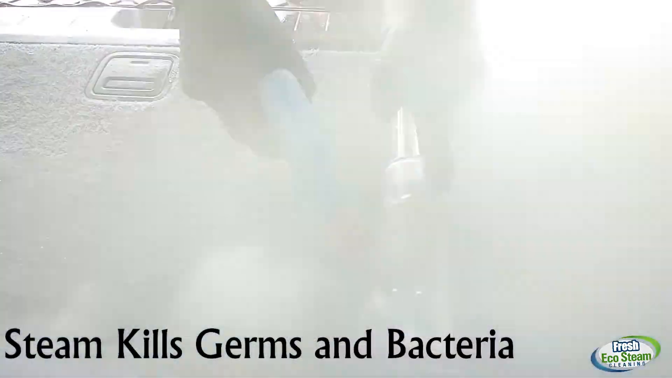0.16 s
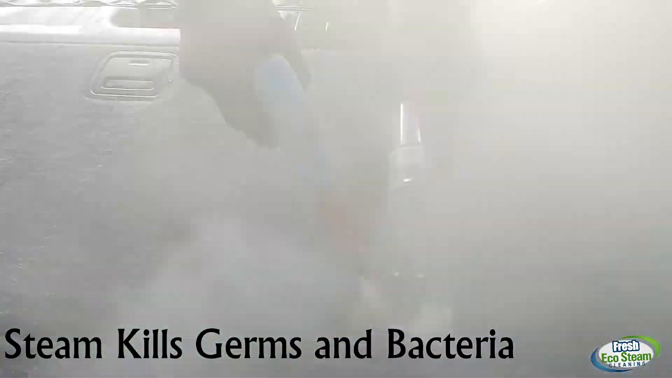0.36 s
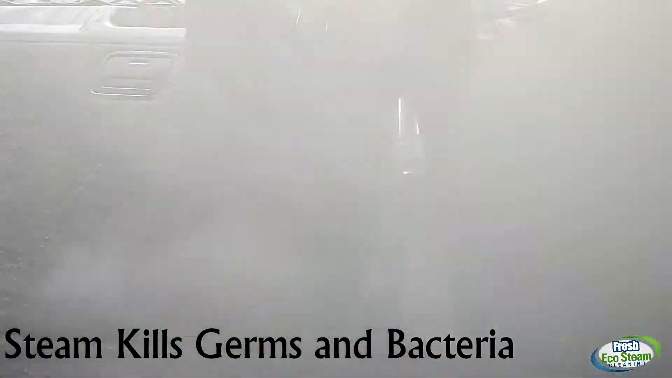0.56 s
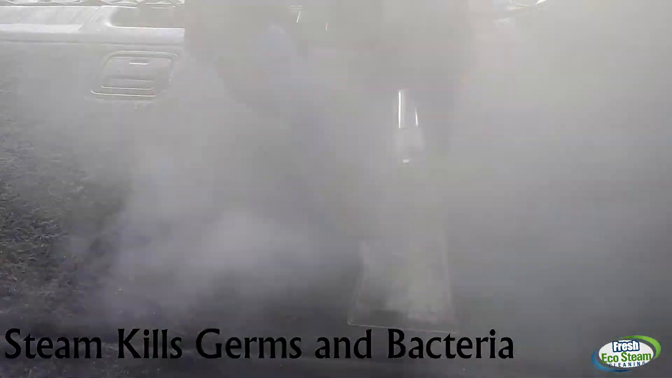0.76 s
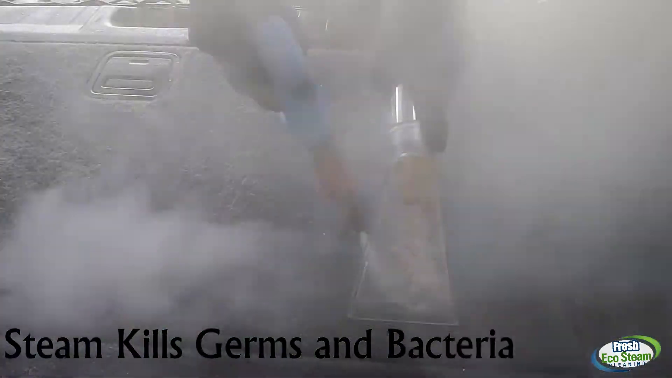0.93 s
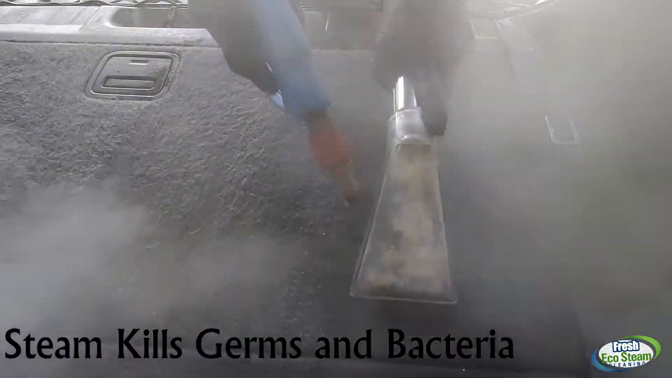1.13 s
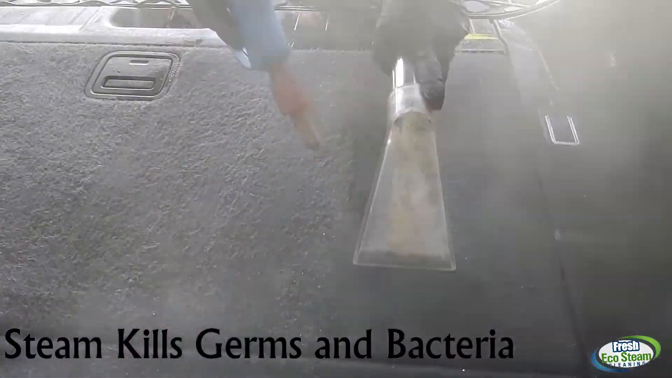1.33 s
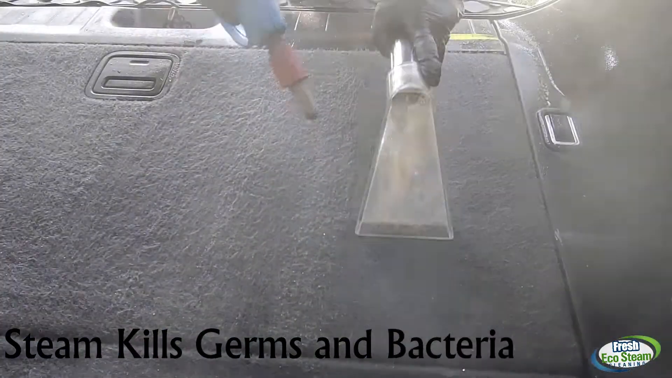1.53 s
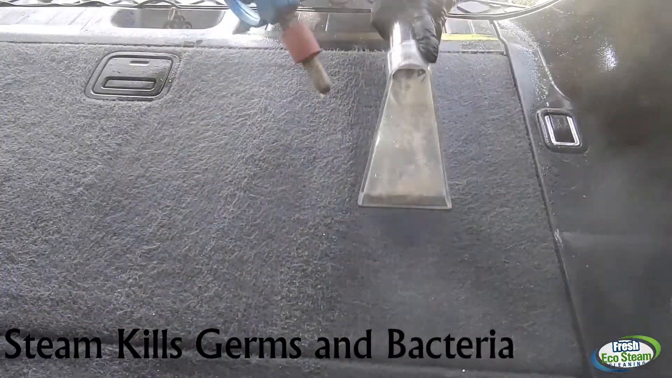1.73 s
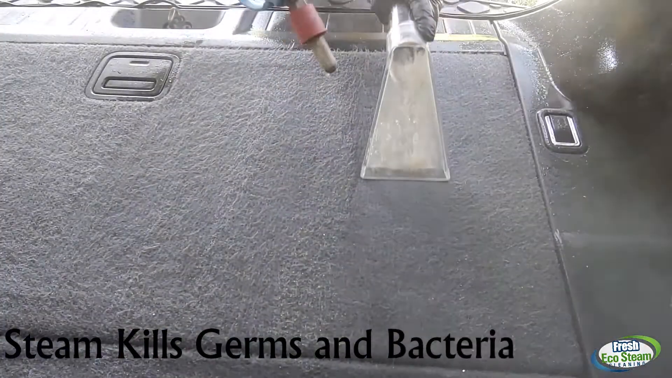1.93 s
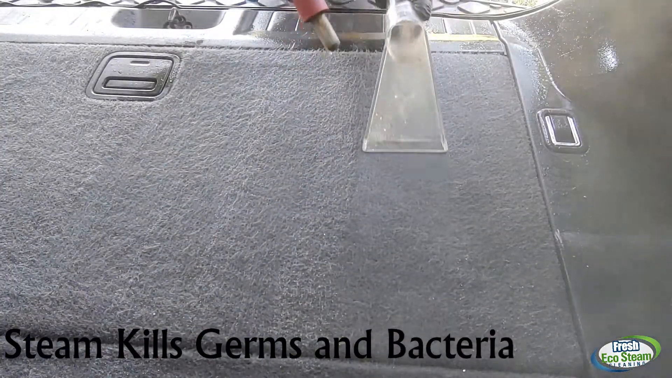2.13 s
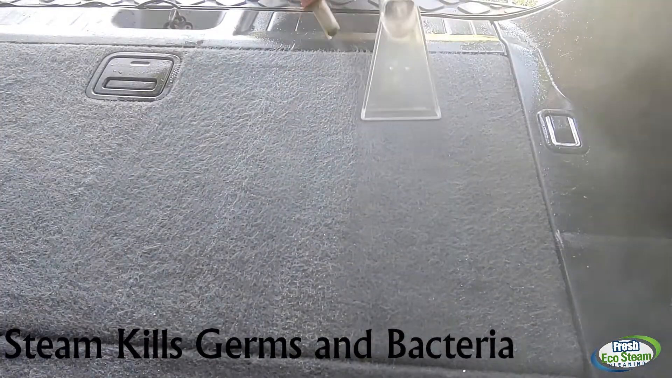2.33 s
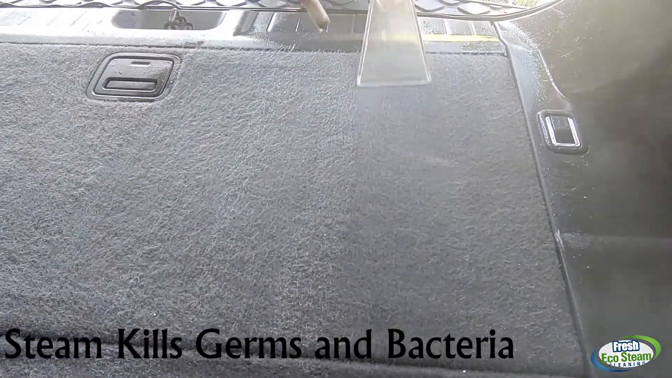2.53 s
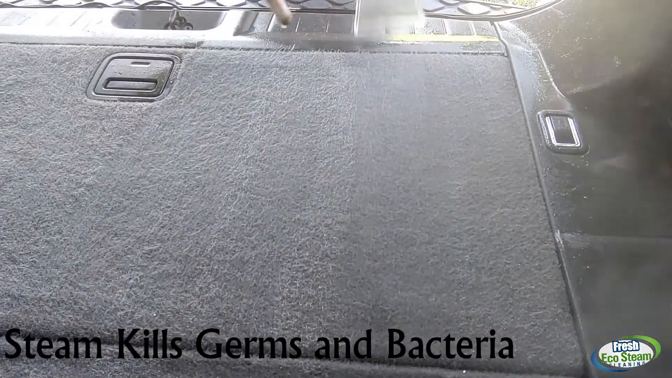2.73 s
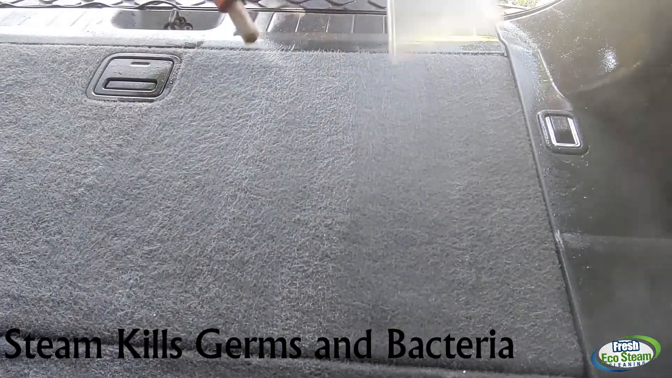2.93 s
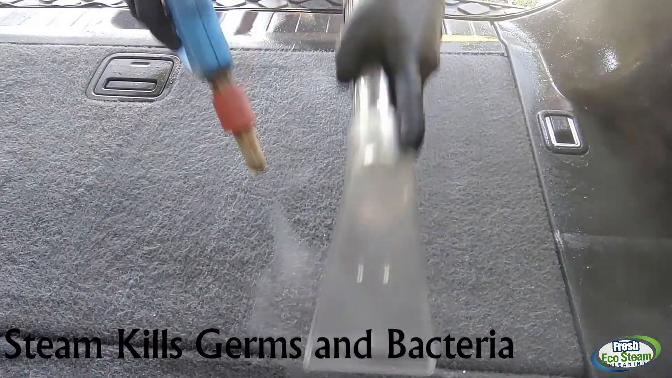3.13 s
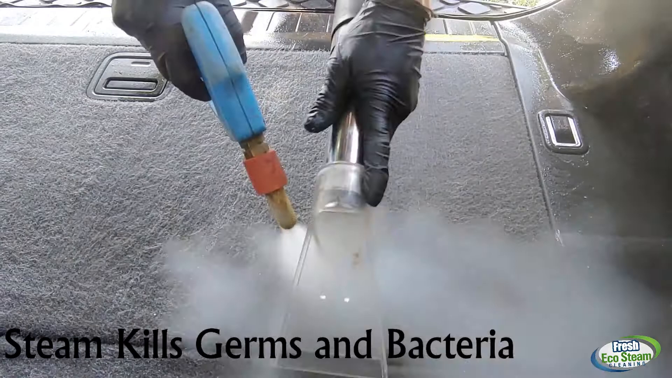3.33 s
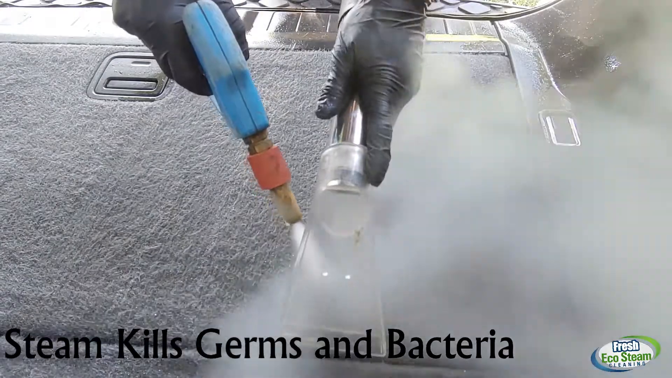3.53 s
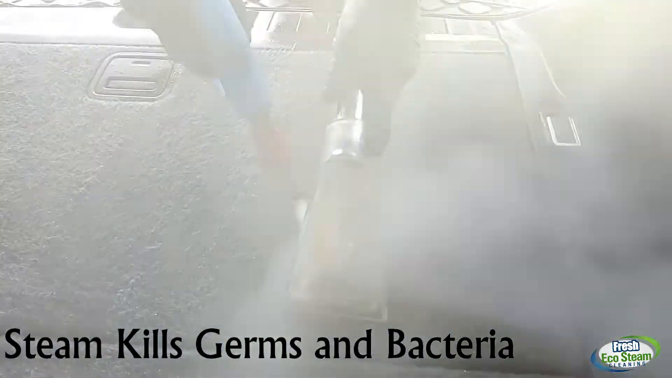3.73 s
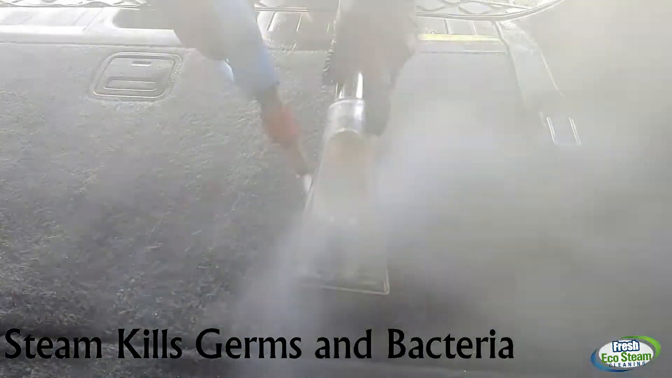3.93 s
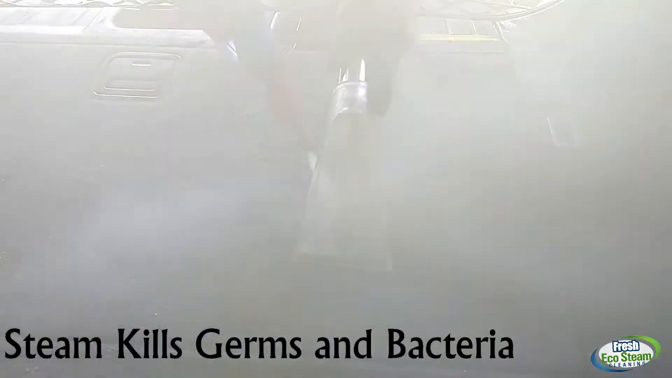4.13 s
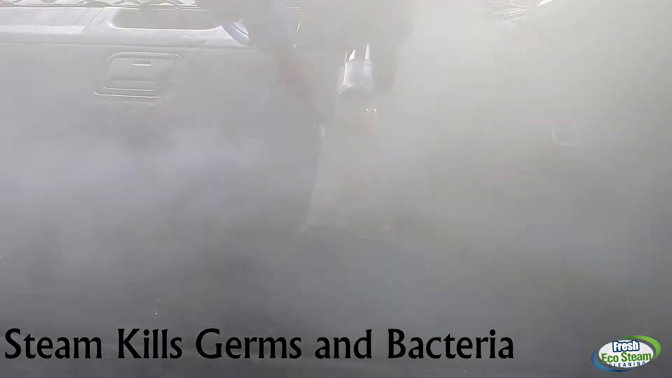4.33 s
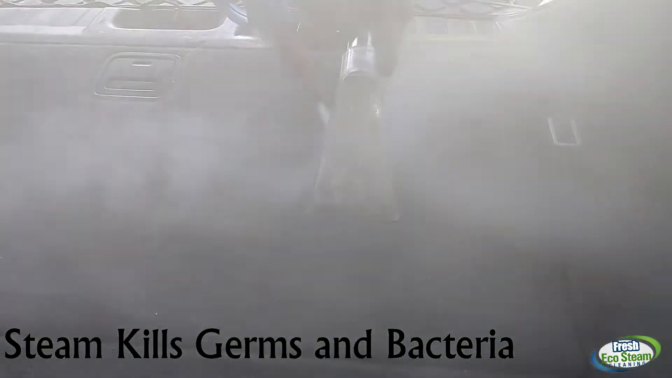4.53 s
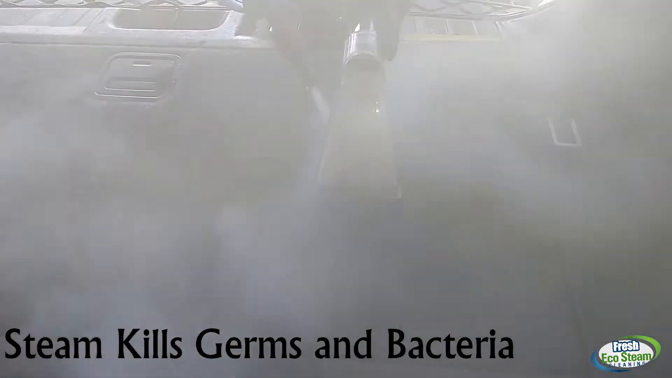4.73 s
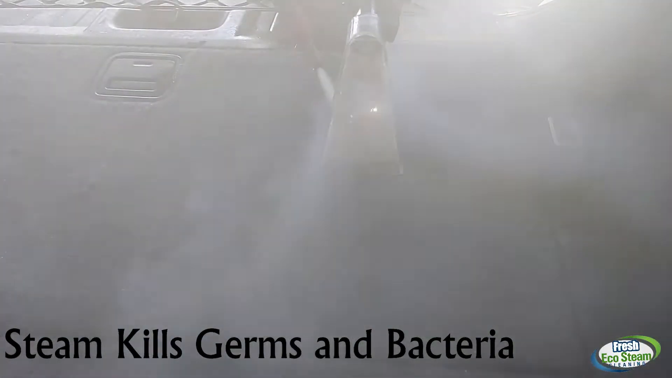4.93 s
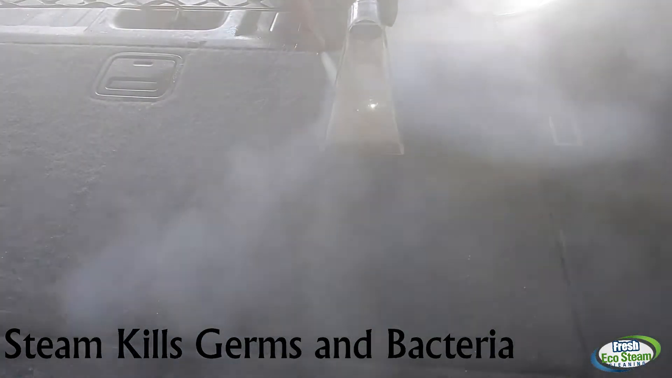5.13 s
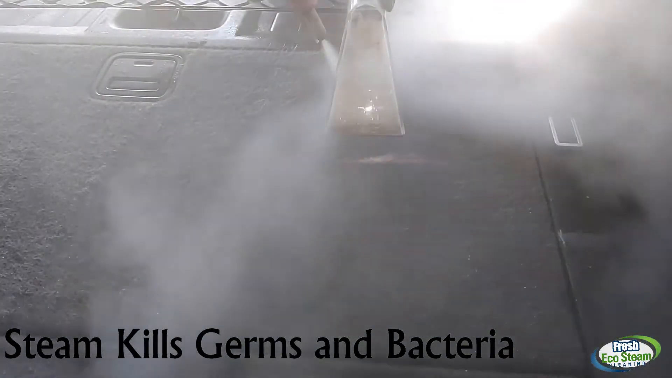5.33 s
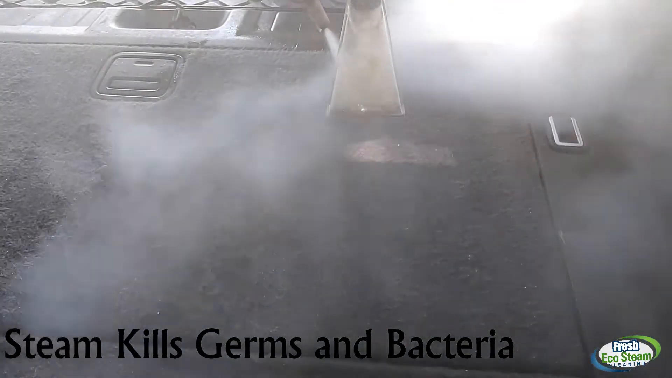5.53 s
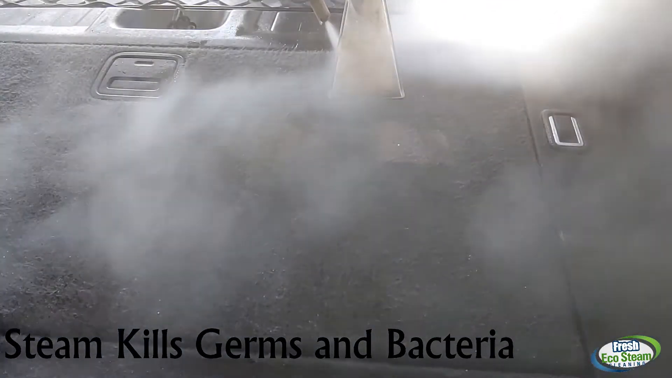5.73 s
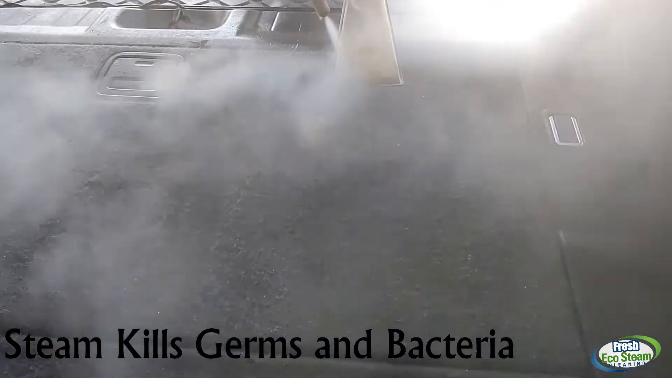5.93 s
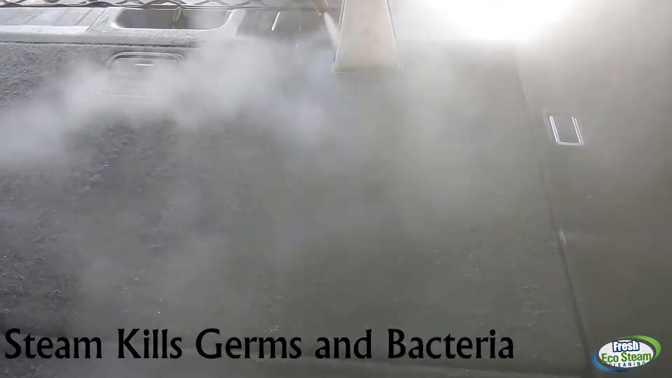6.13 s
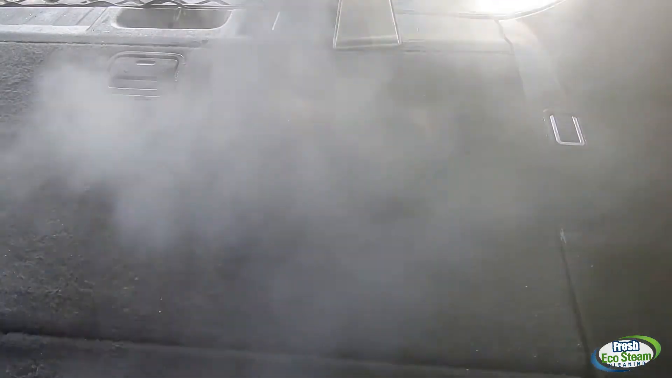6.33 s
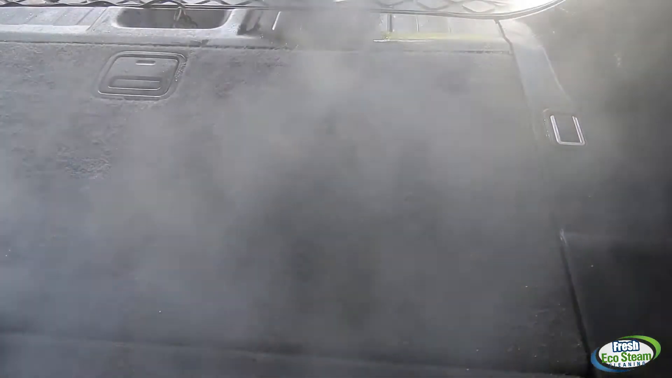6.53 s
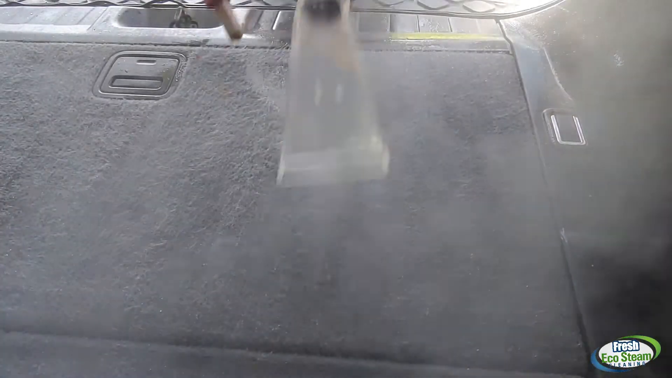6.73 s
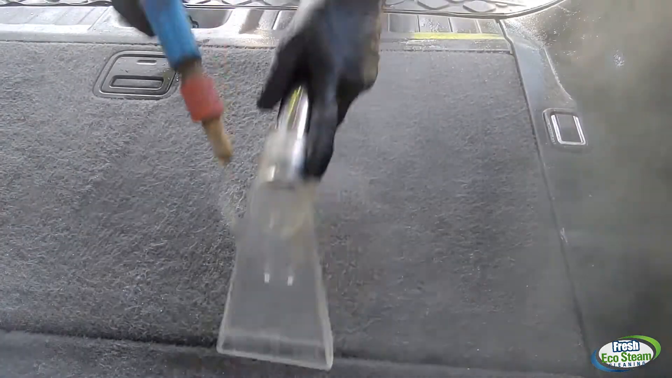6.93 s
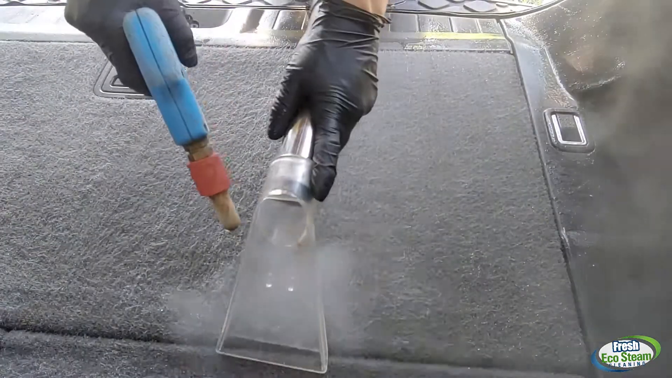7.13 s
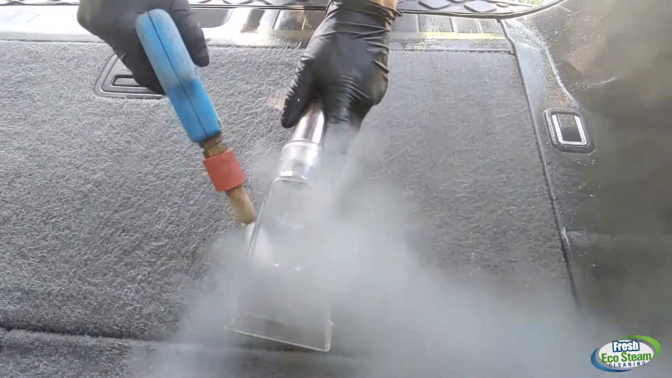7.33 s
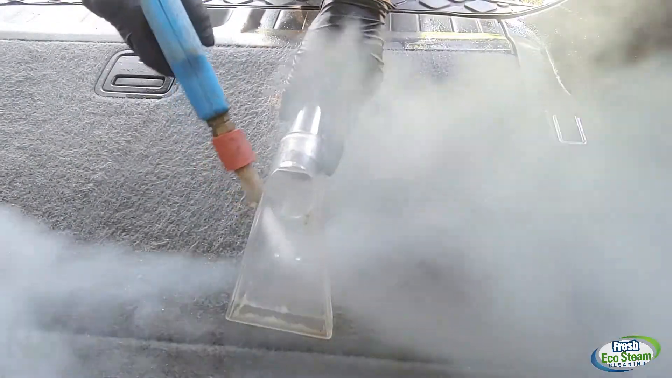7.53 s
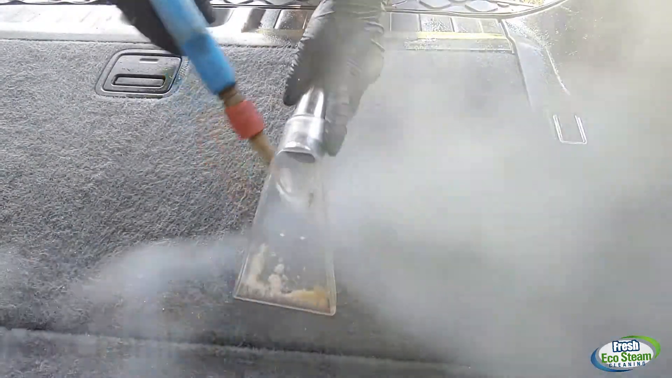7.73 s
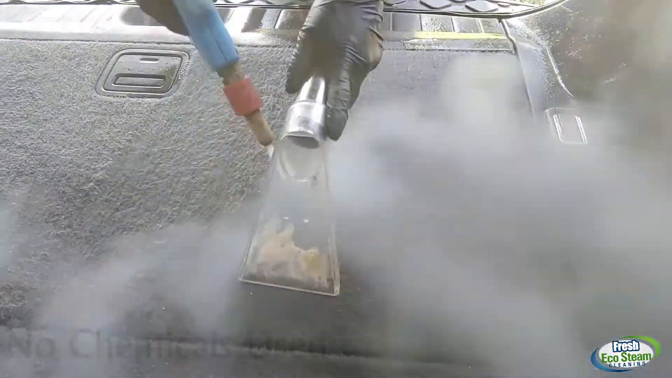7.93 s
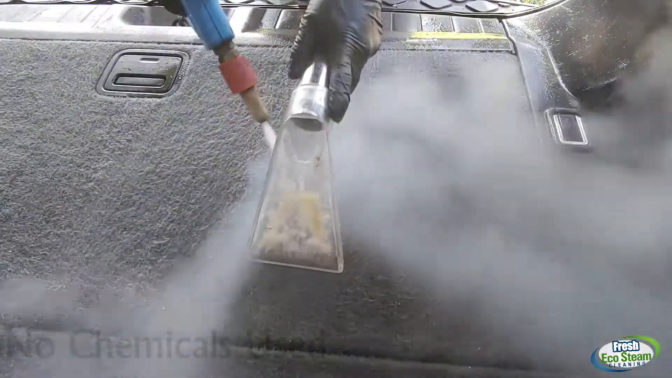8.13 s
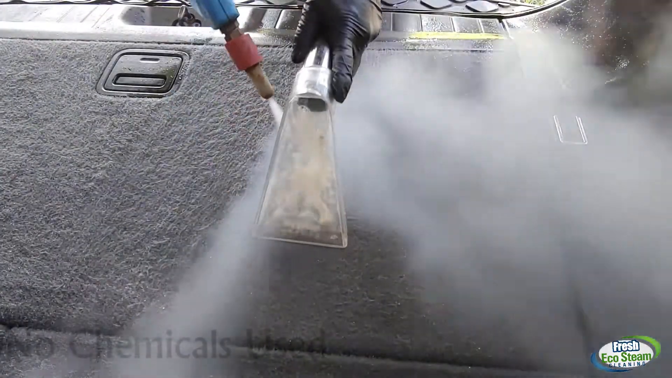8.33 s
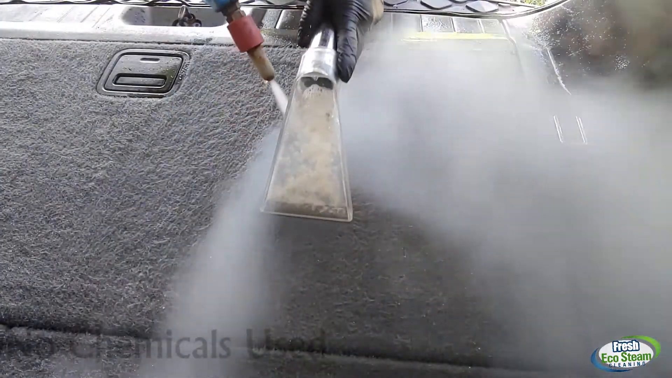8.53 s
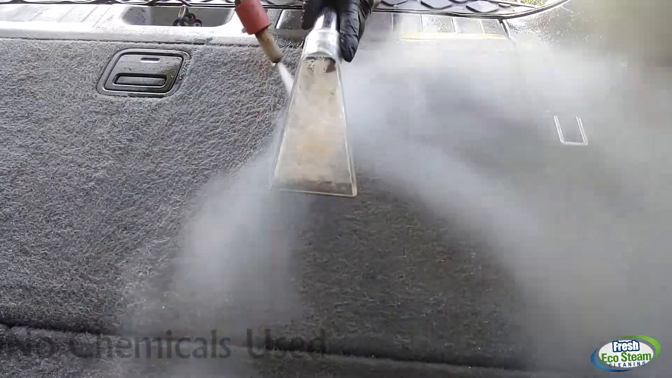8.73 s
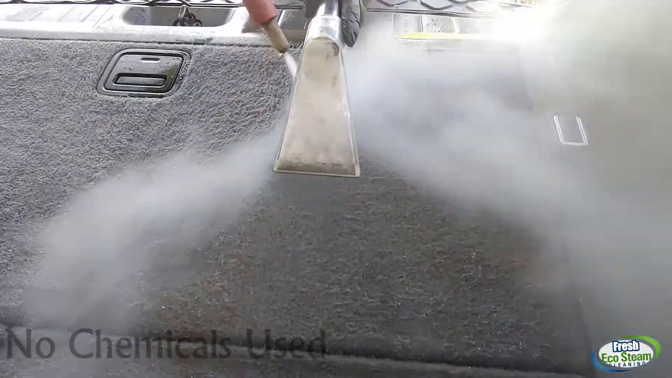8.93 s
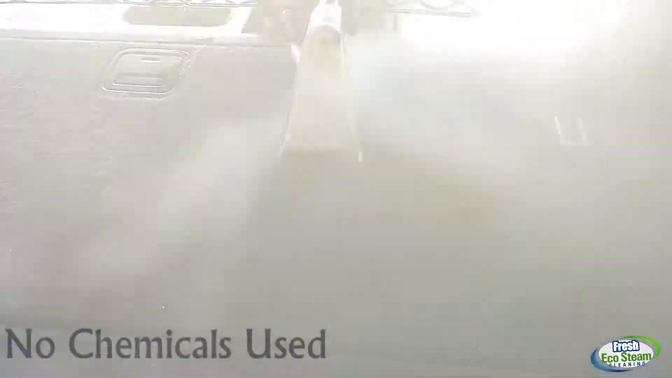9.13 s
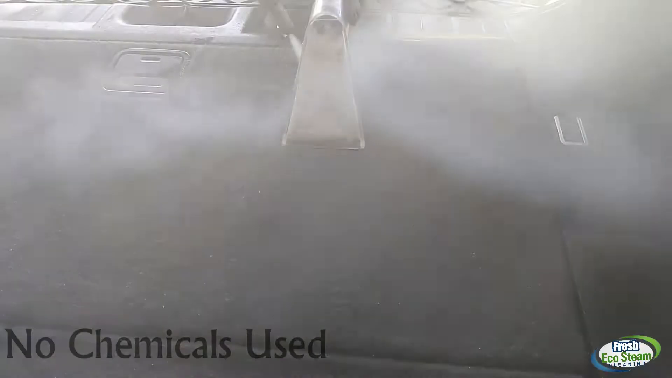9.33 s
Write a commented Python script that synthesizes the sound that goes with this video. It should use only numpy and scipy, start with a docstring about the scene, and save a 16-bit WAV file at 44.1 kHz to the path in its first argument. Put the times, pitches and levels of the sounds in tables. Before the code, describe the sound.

Close stereo pickup inside a hard-walled car boot: a dense steam hiss stops abruptly, revealing a vacuum's steady whine and narrow whistling suction through carpet pile. The nozzle lifts, air rushes in with changing hollow resonance, and dull bumps mark its movement. Steam bursts back for about three seconds, pauses for another suction roar and knock, then sputters on again and continues, masking most of the vacuum.

```python
"""Steam gun and wet vacuum in a car boot

A steam gun blasts three times over the carpet, the first blast already running: coloured noise behind a valve.
A wet-vacuum nozzle is dragged alongside: noise hisses through the pile, or roars in when the nozzle is lifted.
The motor whines on shaft multiples; short dull nozzle knocks are decaying sines.
The hard boot walls comb all the air noise; a small two-port microphone sits close by."""
import sys
import numpy as np
from scipy import signal
from scipy.fft import rfft
from scipy.io import wavfile
from scipy.ndimage import uniform_filter1d, map_coordinates

SR = 44100
rng = np.random.default_rng(int(sys.argv[2]) if len(sys.argv) > 2 else 0)


def master(y):
    """Save y as 16-bit WAV."""
    cut = np.clip(np.atleast_2d(y).T, -1, 1)
    pcm = np.round(cut * 32767)  # scale
    wavfile.write(sys.argv[1], SR, pcm.astype(np.int16))


N = 413216
SIZE = 2048  # samples per spectral frame
OVERLAP = 3 * SIZE // 4
T = np.arange(N) / SR
HZ, FRAMES, _ = signal.stft(T, SR, nperseg=SIZE, noverlap=OVERLAP)
LOG_HZ = np.log(np.maximum(HZ, 1))[:, None]


# Gun movement. Each row: time in seconds, reach into the boot (0 close, 1 deep), shrill core in Hz,
# treble in dB over the 3.5-7 kHz band before the walls and patches.
GUN_PATH = [(0, 0.75, 5300, -17.5), (.35, 0.67, 6140, -21.5), (.65, 0.26, 5170, -24),
            (3.3, 0.2, 5500, -20.5), (3.5, 0.83, 5200, -20), (3.9, 0.15, 5030, -23.5),
            (4.8, 0.47, 4280, -21), (5.8, 1.16, 3870, -19.5), (6.25, 1.04, 4400, -20), (7.17, 0, 5270, -28),
            (7.24, 1.5, 5300, -24), (7.37, 0.86, 5400, -22), (7.7, 0.28, 5070, -25), (8.05, 0, 5040, -25.5),
            (8.45, 0.27, 4800, -23), (8.7, 1, 3700, -20.5), (9.37, 0.96, 3620, -22)]
# Jet colour. Each row: frequency in Hz, close gun in dB per Hz, deep gun in dB per Hz, both relative.
JET_COLOUR = [(25.2, -42, -43), (70, -39, -30), (175, -19.5, -16), (300, -28, -22.5), (693, -18.5, -12.5),
              (1500, -10.5, -4.5), (2470, -7, -3), (5470, -1, -4.5), (5990, -4.5, -7), (7100, -15.5, -12.5),
              (8400, -21.5, -20.5), (9400, -18.5, -15), (11840, -24.5, -21), (12450, -32, -31),
              (15600, -44, -39)]
# Trigger pulls. Each row: trigger in seconds, release in seconds, 3.5-7 kHz level in dB before the reach loss,
# rise in seconds.
BLASTS = [(-.5, .985, -12.5, .01), (3.286, 6.25, -12.5, 0.01), (7.114, 9.9, -13, 0.1)]
REACH_LOSS_DB = -3  # at reach 1
CORE_DB, CORE_WIDTH_HZ = 2.5, 1370
RUMBLE_DB, RUMBLE_REACH_DB = -27.5, 4  # over the 3.5-7 kHz band; gain at reach 1
SPLASH_DB, SPLASH_S = 16, 0.24  # extra rumble from condensed water; decay constant


def steam():
    """The jet loses its 5 kHz edge as the gun moves away; water slugs in the line make it flutter."""
    reach, core_hz, treble_db = columns(GUN_PATH, FRAMES)
    home_hz = (3500, 7000)
    splash = sum((FRAMES > on) * np.exp(-np.abs(FRAMES - on) / SPLASH_S) for on, *_ in BLASTS)
    rumble_db = RUMBLE_DB + RUMBLE_REACH_DB * reach + SPLASH_DB * splash

    near_db, far_db = along_hz(JET_COLOUR), along_hz(JET_COLOUR, column=2)
    colour_db = near_db + reach * (far_db - near_db)
    colour_db = colour_db + bumps([(core_hz, CORE_WIDTH_HZ, CORE_DB)])
    colour_db = shelf(colour_db, rumble_db, (100, 800), home_hz, (1800, 800))
    colour_db = shelf(colour_db, treble_db, (8500, 13000), home_hz, (7000, 8500))

    flutter_db = 0.66 * walk(24)[0] + 0.52 * walk(110)[0]
    gain = valve() * undb(flutter_db + REACH_LOSS_DB * columns(GUN_PATH, T)[0])
    walls = scatter(-1.0, 0.48, 0.804)
    depth = 0.52 + 0.67 * reach  # the walls ring more for a far gun
    return gain * air(colour_db + patches(0.43, 9), *home_hz, walls, depth=depth)


# Dips and surges in the flow. Each row: centre in seconds, change in dB, half length in seconds.
SPUTTERS = [(.33, -1.5, .03), (3.43, -5, 0.016), (3.52, -0.5, 0.057), (3.57, 1.5, 0.014), (3.72, 0, 0.022),
            (7.248, -5.5, 0.053), (7.35, 3, 0.038), (7.43, -0.5, 0.015), (7.458, 3, .01), (8.61, -1, 0.046)]
SHUT_DB_PER_S, SHUT_EASE_S = 900, 0.037  # final fall rate; rounded start
OPEN_DB = -29  # first hiss, relative to the open valve


def valve():
    """Each blast opens, holds and shuts; slugs of water make the flow dip or surge for a moment."""
    flow = 0
    for on, off, db, rise_s in BLASTS:
        late_s = np.maximum(T - off, 0)
        shut_db = -SHUT_DB_PER_S * late_s ** 2 / (late_s + SHUT_EASE_S)
        open_db = OPEN_DB * np.clip(1 - (T - on) / rise_s, 0, 1) ** 2
        flow = flow + (T > on) * undb(db + open_db + shut_db)
    sputter_db = sum(db * np.exp(-((T - s) / half_s) ** 2) for s, db, half_s in SPUTTERS)
    return flow * undb(sputter_db)


# Nozzle lifted, one list per lift. Each row: time in seconds, 0.15-1 kHz roar in dB, 3.5-7 kHz edge hiss in dB,
# resonance of the gap to the carpet in Hz, swish band in Hz.
LIFTS = [
    [(2.62, -57, -46, 500, 3950), (2.66, -37, -28.5, 500, 3950), (2.716, -27, -20.5, 482, 4000),
     (2.77, -28, -30, 452, 4390), (2.88, -26.5, -24.5, 480, 5240), (2.94, -29, -25.5, 503, 5660),
     (3.03, -26, -25.5, 670, 5670), (3.172, -18.5, -29, 690, 4300), (3.21, -24, -25, 696, 4210),
     (3.285, -36, -35, 720, 4210)],
    [(6.3, -52, -32, 500, 4590), (6.44, -30, -35, 450, 4600), (6.5, -43, -36, 400, 4600),
     (6.575, -28, -29.5, 336, 4640), (6.7, -29.5, -30.5, 517, 4400), (6.9, -26, -31, 665, 3600),
     (6.95, -33, -33.5, 690, 4000), (6.984, -21, -36, 700, 4280), (7.0, -36, -52, 700, 4300)],
    [(7.21, -50, -38, 800, 4300), (7.228, -29, -25, 823, 4300), (7.27, -32, -27, 800, 4300),
     (7.298, -24, -26, 804, 4300), (7.35, -32, -25.5, 800, 4300), (7.38, -49, -42, 800, 4280)],
]
# Open mouth colour. Each row: frequency in Hz, relative level in dB per Hz.
MOUTH_COLOUR = [(25, -20), (65, -4), (110, -7.5), (180, -3.5), (400, -3), (700, 0), (1100, -6), (2200, -13),
                (3100, -7), (5600, -9.5), (8200, -33), (9500, -34), (12000, -39.5), (12500, -48),
                (15600, -58)]
# Mouth resonances. Each row: frequency in Hz, width in Hz, height in dB.
MOUTH_MODES = [(1225, 140, 6), (1810, 220, 8.5), (3300, 69, 8)]
BODY_DB, HOSE_DB = 1.8, -14  # 1.2-3 kHz body and 40-130 Hz hose rumble, over the edge hiss
WHISTLE_DB, WHISTLE_STOPS_HZ, WHISTLE_SPAN_HZ = 17.5, 626, 60  # greatest height; fades as the gap rises
SWISH_DB, SWISH_WIDTH_HZ = 4.5, 220


def inrush():
    """Air roars into the open mouth; the gap to the carpet resonates higher or lower as it changes."""
    gain = play(LIFTS, fade_s=0.054)
    roar_db, hiss_db, gap_hz, swish_hz = columns(np.vstack(LIFTS), FRAMES)
    gusts = undb(0.8 * walk(31)[0])
    edge_db = hiss_db - roar_db
    whistle_db = WHISTLE_DB / (1 + np.exp((gap_hz - WHISTLE_STOPS_HZ) / WHISTLE_SPAN_HZ))
    home_hz = (150, 1000)

    colour_db = along_hz(MOUTH_COLOUR) + bumps(MOUTH_MODES)
    colour_db = colour_db + bumps([(gap_hz, 0.42 * gap_hz, 7), (1600, 50, whistle_db)])
    colour_db = colour_db + patches(2.0, 12)
    colour_db = colour_db + bumps([(swish_hz, SWISH_WIDTH_HZ, SWISH_DB)])
    colour_db = shelf(colour_db, edge_db + BODY_DB, (1200, 3000), home_hz, (850, 1200))
    colour_db = shelf(colour_db, edge_db, (3500, 7000), home_hz, (2800, 3600))
    colour_db = shelf(colour_db, edge_db + HOSE_DB, (40, 130), home_hz, (170, 120))
    return gain * gusts * air(colour_db, *home_hz, scatter(-2.5, 0.099, 0.2))


# Nozzle on the carpet. Each row: time in seconds, mean 1-6.6 kHz level in dB, slot song (0-1).
SUCTION = [(0, -31, 0.2), (1.03, -38, .35), (1.45, -34.5, 0.77), (2.12, -29, 0.81), (2.75, -28, 0.9),
           (3.3, -27.5, 0.3), (3.6, -38, 1), (6.2, -32, 1), (6.99, -37, 0.83), (7.108, -33, 0.6),
           (7.15, -28, 0.93), (7.5, -37, .7)]
# Pile hiss colour. Each row: frequency in Hz, relative level in dB per Hz.
PILE_COLOUR = [(25, -32), (60, -11), (130, -15.5), (280, -23.5), (370, -14), (600, -16.5), (1500, -15.5),
               (2300, -12), (3100, -15), (4800, -14.5), (6400, -17), (8000, -37), (12000, -48),
               (12500, -56), (15600, -66)]
# Slot resonances. Each row: frequency in Hz, width in Hz, height in dB at slot song 1.
SLOT_MODES = [(1510, 140, 6.5), (2266, 24, 28.5), (2490, 27, -3), (2547, 90, 13), (3620, 60, 10),
              (3945, 92, 8), (4540, 44, -8)]
# Machine hums. Each row: frequency in Hz, mean sine peak in dB relative to the suction level.
HUMS = [(73, -21.5), (360, -29.5)]


def suction():
    """Air drawn through the pile sings in the nozzle's narrow slots; it goes on under the louder sounds."""
    gain = undb(columns(SUCTION, T)[0] + 0.5 * walk(2.6)[0])
    slots_db = bumps(SLOT_MODES) * columns(SUCTION, FRAMES)[1]
    uneven_db = patches(0.8, 5)
    hiss = air(along_hz(PILE_COLOUR) + slots_db + uneven_db, 1000, 6600, scatter(-7, 0.12, 1.58))
    hum = sum(undb(db + 2.5 * walk(3.5)[0]) * np.sin(2 * np.pi * hz * T) for hz, db in HUMS)
    return gain * (hiss + hum)


# Motor, faster when starved of air. Each row: time in seconds, shaft rate in Hz, overall gain in dB,
# extra blade gain in dB.
MOTOR = [(0, 497, -53, 0), (.95, 525, -56.5, -2), (1.4, 526.4, -45, 3.5), (1.95, 529, -35, -3),
         (2.3, 518, -35.5, -9), (2.65, 517, -38, -7), (3.3, 481, -35, -12), (3.6, 484, -51, -6),
         (4.6, 516, -53.5, -4), (5.5, 524, -44, 15), (6.38, 526, -40, -12), (6.75, 495, -37, -5),
         (7, 477, -35, -13), (7.281, 477, -35.5, -6), (7.45, 484, -55, 2), (8.2, 522, -53, -4),
         (9.37, 519, -44, 4)]
# Partials, shaft first, then blades. Each row: shaft multiple, mean relative level in dB.
FAN = [(1, -4), (2, -11), (3, -13), (4, -19), (9, -4.5), (12, -4)]


def motor():
    """Shaft tone and fan-blade multiples; each wavers on its own."""
    hz, db, blade_db = columns(MOTOR, T)
    phase = 2 * np.pi * np.cumsum(hz * (1 + 0.00049 * walk(17.0)[0])) / SR
    wavers = walk(8.1, count=len(FAN))
    partials = [undb(level_db + 0.78 * waver) * np.sin(multiple * phase)
                for (multiple, level_db), waver in zip(FAN, wavers)]
    shaft, blades = partials[0], sum(partials[1:])
    side = np.array([[1], [-1]])  # left, right
    whine = shaft * undb(1.8 * side) + blades * undb(blade_db - 1.4 * side)
    return np.sqrt(2) * undb(db) * whine


# Nozzle knocks. Each row: start in seconds, strength in dB.
KNOCKS = [(2.649, -25), (3.249, -20), (6.981, -16), (7.289, -35)]
# Knock modes. Each row: frequency in Hz, relative level in dB, 60 dB decay in seconds.
KNOCK_MODES = [(76, 5.5, 0.061), (184, 4.5, 0.062), (430, -3, 0.048), (690, -16, .03)]


def knocks():
    """Short dull thumps as the nozzle leaves, meets or bumps the floor: a few quickly decaying modes."""
    t, out = T[:SR // 5], np.zeros(N + SR)
    phases = rng.uniform(0, 2 * np.pi, (len(KNOCKS), len(KNOCK_MODES)))
    attack = np.minimum(t / 0.0028, 1)
    for (start_s, db), turns in zip(KNOCKS, phases):
        ring = sum(undb(mode_db - 60 * t / t60_s) * np.sin(2 * np.pi * hz * t + turn)
                   for (hz, mode_db, t60_s), turn in zip(KNOCK_MODES, turns))
        first = int(start_s * SR)
        out[first:first + len(t)] += undb(db - 5.5) * ring * attack
    return out[:N]


# Boot wall resonances. Each row: frequency in Hz, width in Hz, height in dB at depth 1 (dips below zero).
BOOT_MODES = [(542, 55.5, -13), (625, 110, 2), (1007, 92, -3), (1265, 43, 3), (1320, 94, -5.5),
              (1570, 92, 1), (1784, 93, -7), (2192, 60, 5.5), (2246, 57, -7.5), (2752, 27, 5),
              (2860, 53, -9.5), (2910, 73, 3.5), (3305, 220, -4), (3481, 35, 7)]
# Stereo swing. Each row: time in seconds, left minus right in dB before the port share.
PAN = [(0.0, -12.5), (0.21, -13.5), (0.96, -5), (3.18, -9), (3.44, -3.5), (4.75, -3), (7.3, -9),
       (7.67, -3.5), (8.46, -3), (9.37, -6)]
# The two ports. Each row: frequency in Hz, share of the pan, own left minus right in dB,
# unrelated part in dB at a pan of -4 dB.
PORTS = [(60, 0.45, 1.5, -18), (400, 0.044, 0.5, -18.5), (796, 0.11, 0.5, -19), (1370, 0.56, 0, -24),
         (7660, 0.6, 1.5, -20.5), (8950, -0.39, 0.5, -24), (10700, -.8, -5.5, -9), (11600, -1.9, -2.5, -3),
         (13500, -1.3, -4.5, -7)]
UNRELATED_DB_PER_DB = 1.1  # the ports grow less alike per dB of pan below -4, up to 0 dB


def air(shape_db, lo_hz, hi_hz, walls, depth=1):
    """Turbulence in a moving colour at both ports, about rms 1 in the given band."""
    shape_db = shape_db + depth * bumps(BOOT_MODES)
    gain = undb(shape_db - band_db(shape_db, lo_hz, hi_hz)) * np.sqrt(len(HZ)) * walls
    noise = rng.standard_normal((2, N))
    same, other = signal.stft(noise, nperseg=SIZE, noverlap=OVERLAP)[2]
    unrelated_db = along_hz(PORTS, column=3) - UNRELATED_DB_PER_DB * (columns(PAN, FRAMES)[0] + 4)
    other = other * undb(np.minimum(unrelated_db, 0))
    half = undb(pan_db() / 2)
    ports = gain * np.array([half * (same + other), (same - other) / half])
    return signal.istft(ports, nperseg=SIZE, noverlap=OVERLAP)[1][:, :N]


def pan_db():
    """Left minus right per band and frame."""
    return along_hz(PORTS) * columns(PAN, FRAMES)[0] + along_hz(PORTS, column=2)


def scatter(wet_db, t60_s, drift_s):
    """Direct sound plus a spray of wall echoes that changes as the hands move."""
    places = int(T[-1] / drift_s) + 2
    echoes = rng.standard_normal((places, SIZE // 2)) * undb(-60 * T[:SIZE // 2] / t60_s)
    echoes = echoes / np.sqrt(np.sum(echoes ** 2, axis=1, keepdims=True))
    spectra = rfft(echoes, SIZE).T
    place = FRAMES / drift_s
    k, angle = place.astype(int), place % 1 * np.pi / 2
    wet = spectra[:, k] * np.cos(angle) + spectra[:, k + 1] * np.sin(angle)  # equal-power crossfade
    return (1 + undb(wet_db) * wet) / np.sqrt(1 + undb(2 * wet_db))


def patches(db, rate_hz, count=24):
    """Bands whose levels wander, each on its own."""
    place = np.linspace(0, count - 1, len(HZ))[:, None] + 0 * FRAMES
    place = (count - 1) * np.sqrt(place / (count - 1))  # narrower bands in the bass
    grid = walk(rate_hz, count=count, length=len(FRAMES), step_s=FRAMES[1])
    return db * map_coordinates(grid, [place, np.arange(len(FRAMES)) + 0 * place], order=1)


def walk(rate_hz, count=1, length=N, step_s=1 / SR):
    """Random levels smoothed twice over 1 / rate_hz seconds, spread 1."""
    k = max(int(1 / (rate_hz * step_s)), 1)
    x = rng.standard_normal((count, length))
    x = uniform_filter1d(uniform_filter1d(x, k), k)
    return x / x.std()


def shelf(shape_db, wanted_db, band_hz, home_hz, slope_hz):
    """Lifts one end of a colour towards a band level of wanted_db over the home band."""
    lift_db = wanted_db - band_db(shape_db, *band_hz) + band_db(shape_db, *home_hz)
    start_hz, end_hz = slope_hz
    ramp = np.clip((LOG_HZ - np.log(start_hz)) / np.log(end_hz / start_hz), 0, 1)
    return shape_db + lift_db * ramp


def band_db(shape_db, lo_hz, hi_hz):
    """Power of a dB shape inside a band."""
    inside = (HZ >= lo_hz) & (HZ < hi_hz)
    return 10 * np.log10(np.sum(undb(shape_db[inside]) ** 2, axis=0))


def bumps(modes):
    """dB shape of a set of resonances."""
    return sum(db / (1 + (2 * (HZ[:, None] - hz) / width_hz) ** 2) for hz, width_hz, db in modes)


def along_hz(table, column=1):
    """A table column on a log-frequency axis."""
    rows = np.array(table, float)
    return np.interp(LOG_HZ, np.log(rows[:, 0]), rows[:, column])


def columns(table, at_s):
    """Every column after the time, at the given times."""
    rows = np.array(table, float)
    return [np.interp(at_s, rows[:, 0], values) for values in rows.T[1:]]


def play(tables, fade_s):
    """Joins the level columns of tables into a gain per sample, silent between them."""
    gate = 0
    for table in tables:
        first_s, last_s = table[0][0], table[-1][0]
        inside_s = np.minimum(T - first_s + fade_s, last_s + fade_s - T)
        gate = gate + np.clip(inside_s / fade_s, 0, 1)
    return gate * undb(columns(np.vstack(tables), T)[0])


def undb(db):
    """Gain of a level in dB."""
    return 10 ** (np.asarray(db) / 20)


def scene():
    """Everything inside the boot."""
    return steam() + suction() + inrush() + motor() + knocks()


TOP_HZ = 15730


def record(dry):
    """The recorder clips peaks beyond 0.95 and cuts the top."""
    cut = signal.ellip(12, 0.2, 80, TOP_HZ, fs=SR, output="sos")
    return signal.sosfilt(cut, np.clip(dry, -0.95, 0.95))


dry = scene()
out = record(dry)
master(out)
```